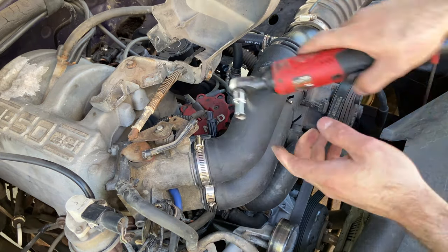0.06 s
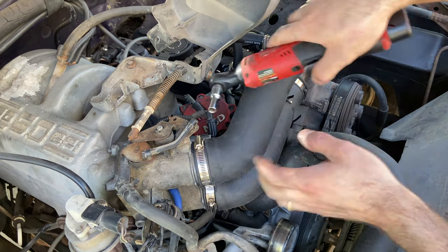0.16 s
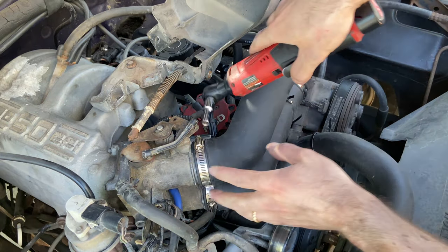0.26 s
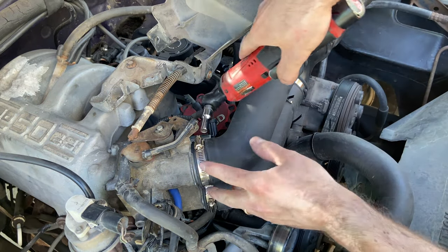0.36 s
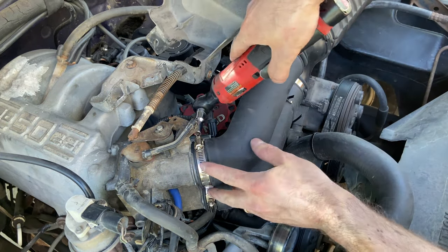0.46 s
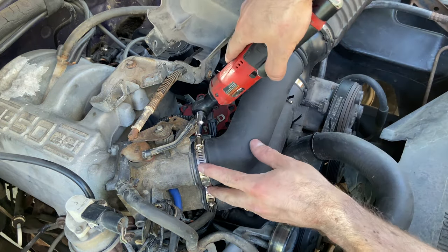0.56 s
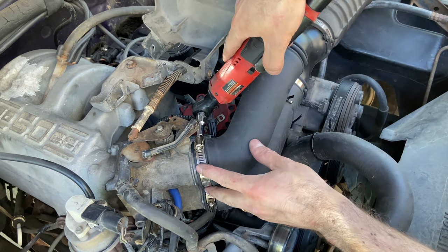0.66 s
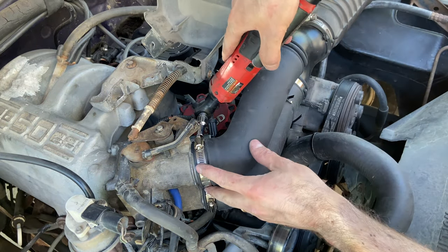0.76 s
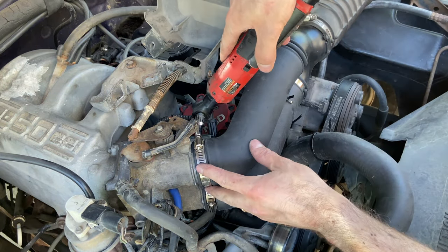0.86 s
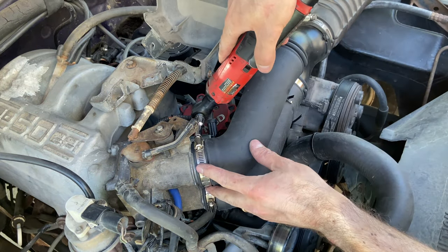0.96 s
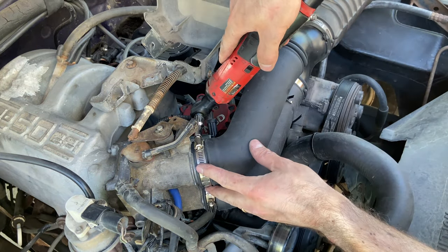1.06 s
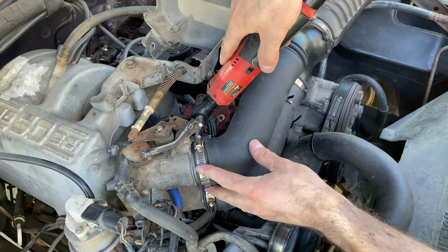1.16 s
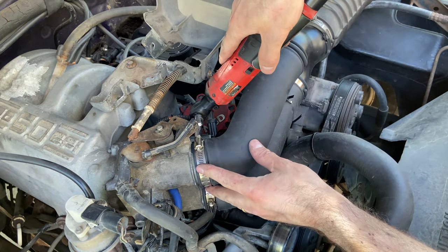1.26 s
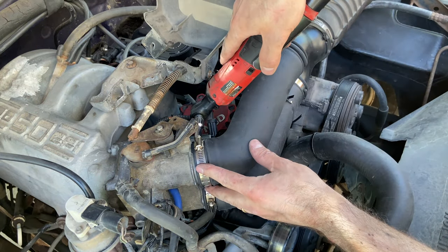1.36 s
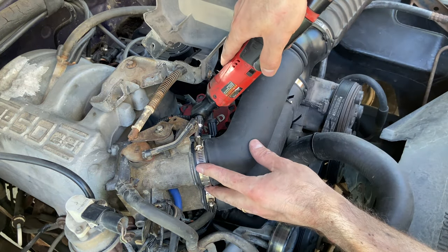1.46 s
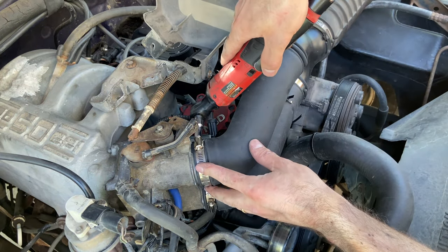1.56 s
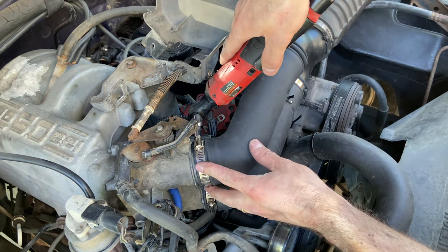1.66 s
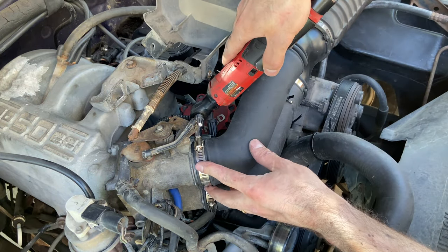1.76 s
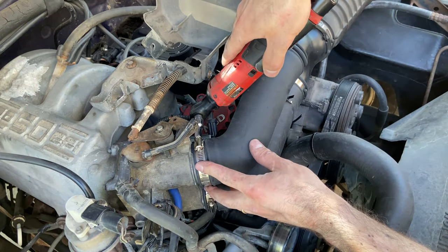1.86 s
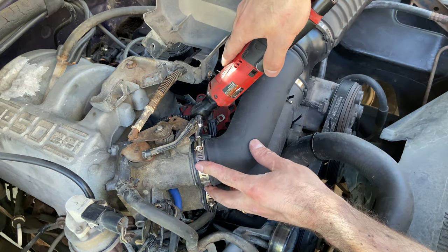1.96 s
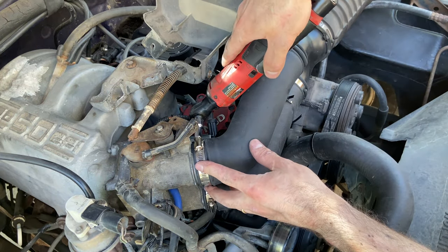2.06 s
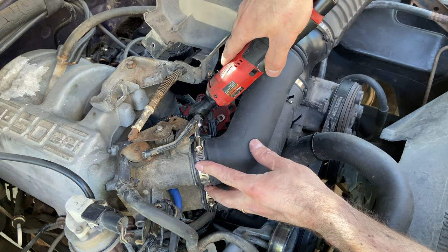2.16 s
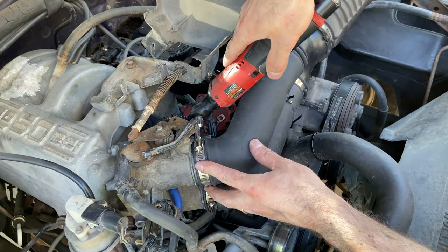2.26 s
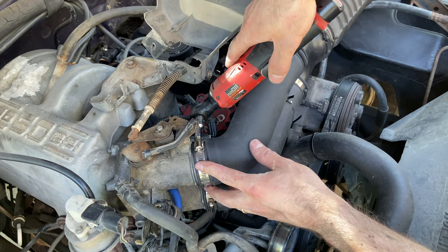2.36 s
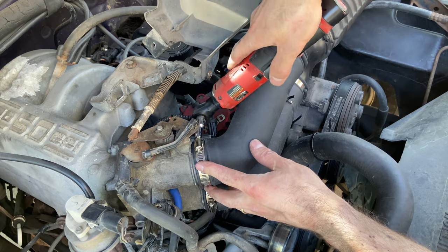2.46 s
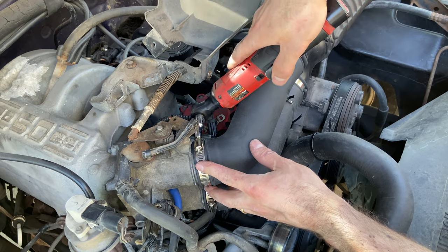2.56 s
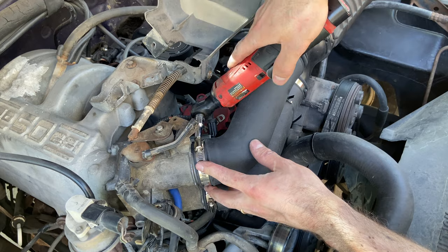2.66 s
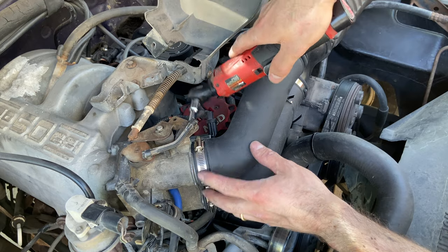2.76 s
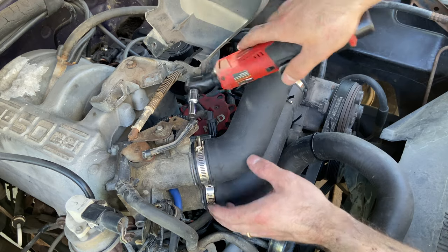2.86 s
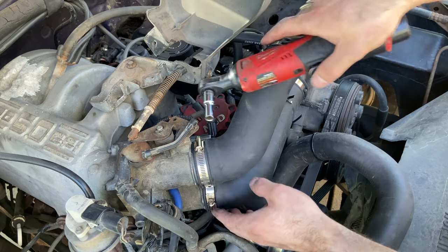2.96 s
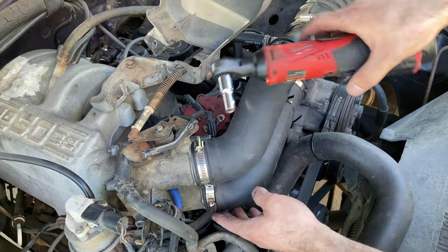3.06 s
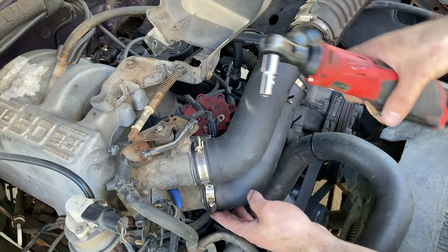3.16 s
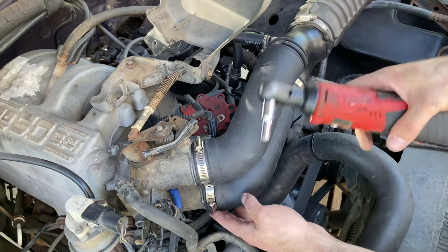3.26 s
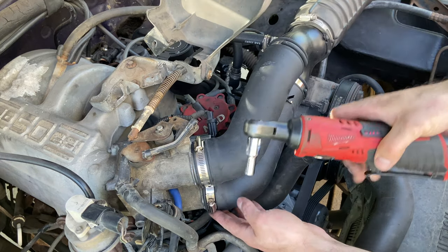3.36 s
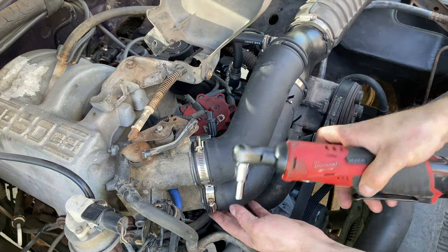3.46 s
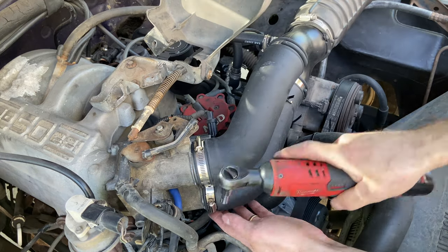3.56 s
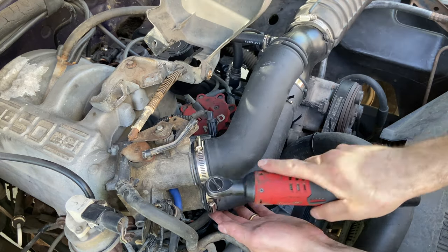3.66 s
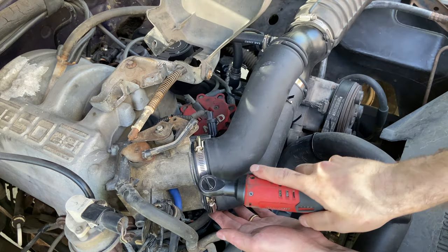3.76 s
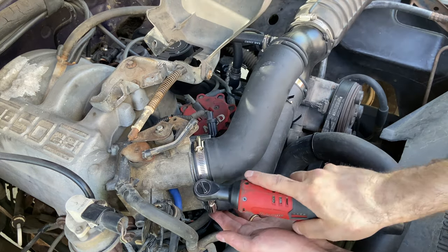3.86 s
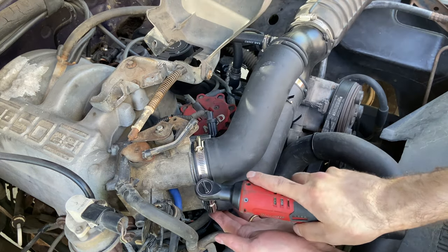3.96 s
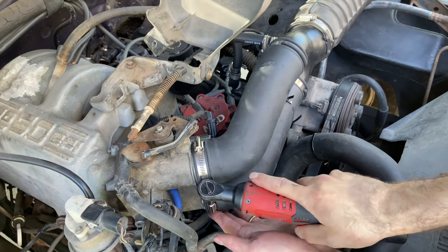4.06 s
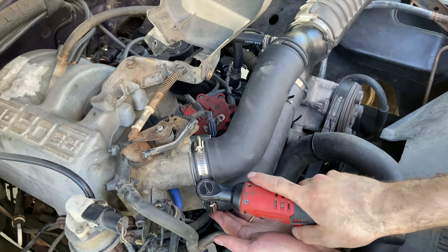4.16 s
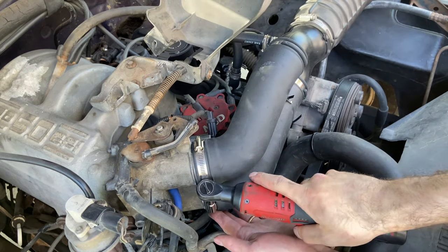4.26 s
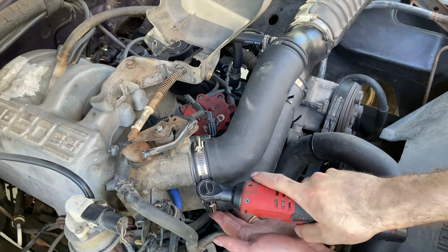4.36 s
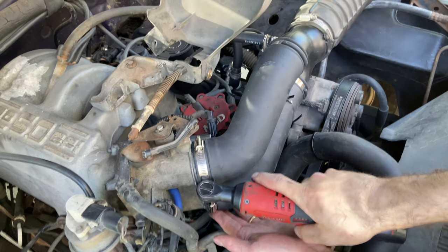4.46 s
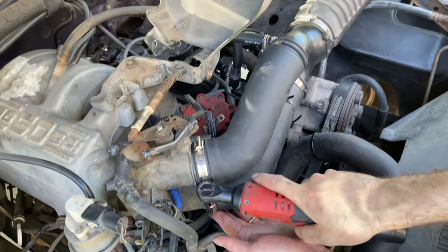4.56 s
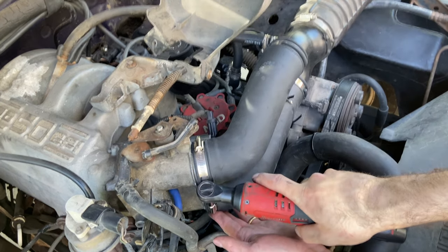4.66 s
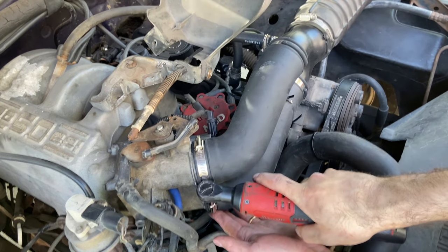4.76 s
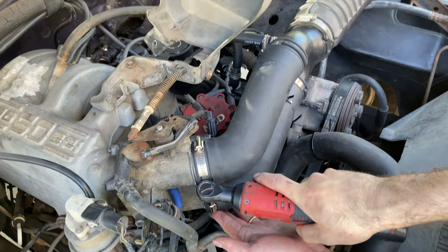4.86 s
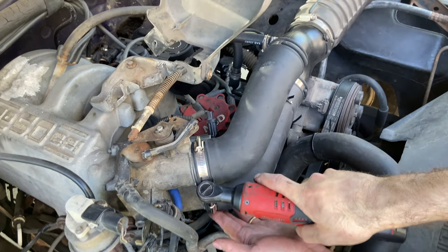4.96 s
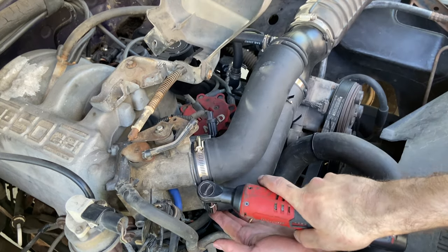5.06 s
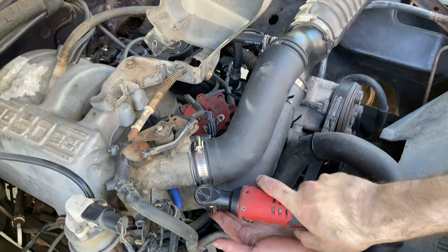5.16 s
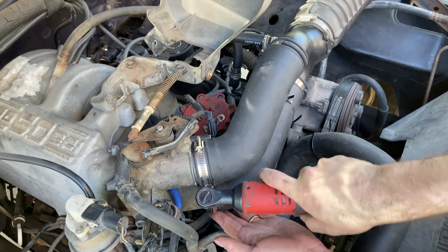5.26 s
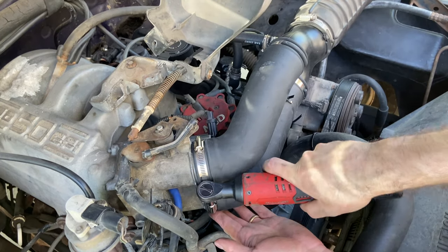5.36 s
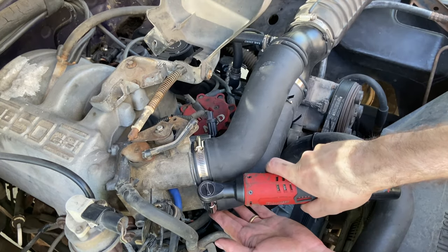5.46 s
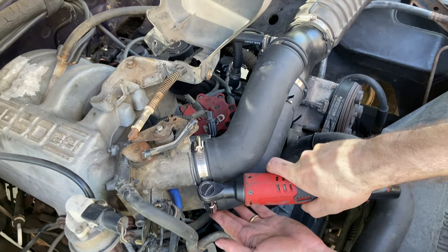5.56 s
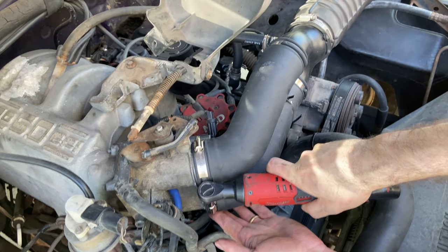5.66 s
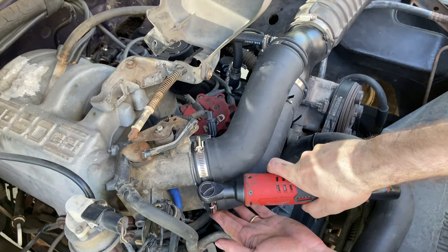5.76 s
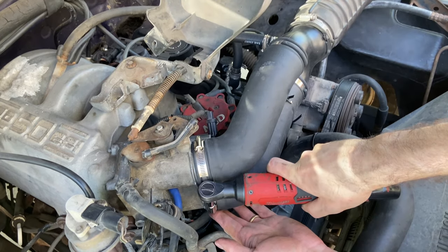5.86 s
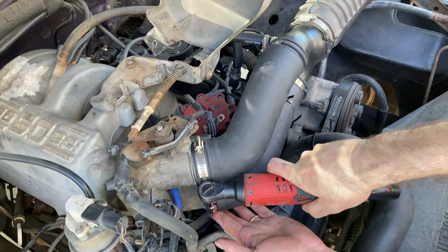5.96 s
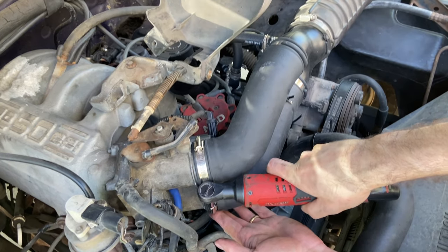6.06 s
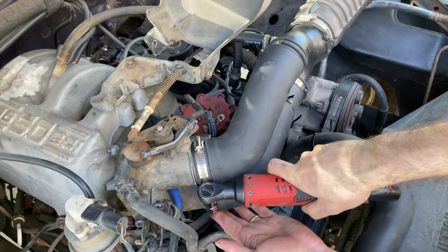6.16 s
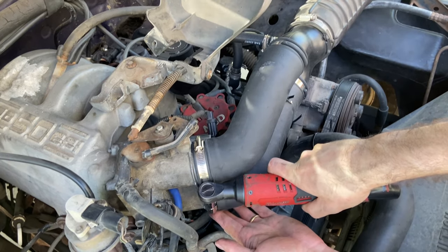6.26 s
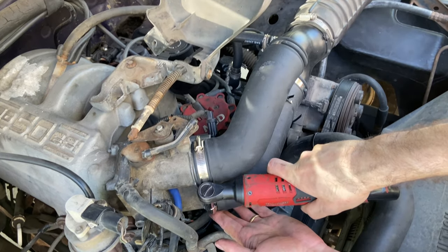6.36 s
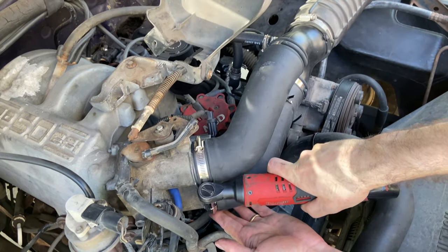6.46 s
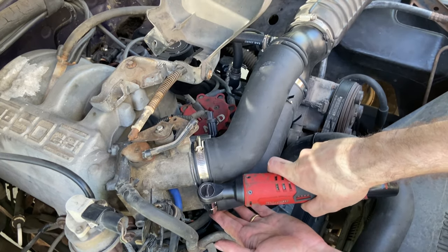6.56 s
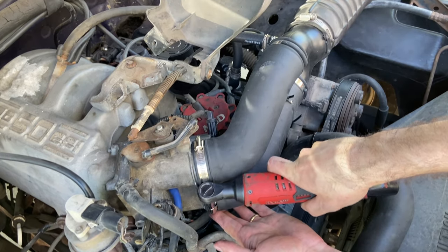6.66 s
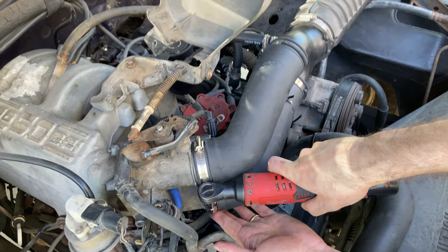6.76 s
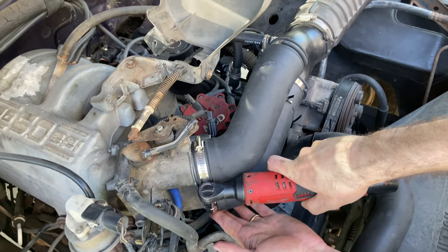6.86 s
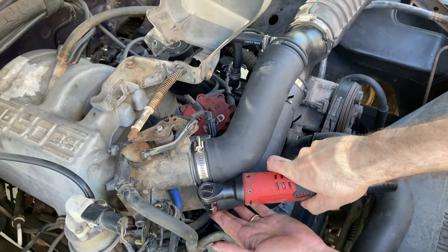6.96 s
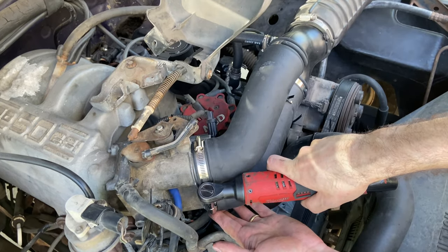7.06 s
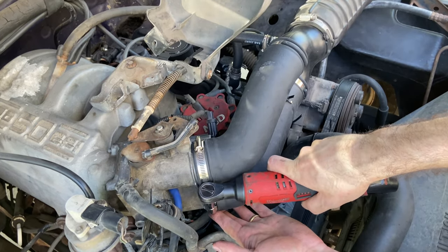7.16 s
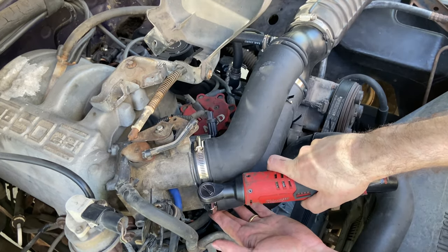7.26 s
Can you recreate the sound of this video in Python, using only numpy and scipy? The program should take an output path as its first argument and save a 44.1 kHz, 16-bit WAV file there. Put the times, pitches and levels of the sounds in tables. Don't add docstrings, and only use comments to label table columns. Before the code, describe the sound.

Outdoors, a close stereo microphone hears light finger and socket taps on hose and metal, then a cordless electric ratchet bursting into a bright, grainy clicking rattle that slows to separate ticks. Dull hose thumps and a metal knock follow as it moves. It then runs twice at length, each winding down, and ends with a feeble short pull. Wind buffets the microphone over faint traffic and leaves.

```python
import sys
import numpy as np
from scipy import signal
from scipy.fft import rfft, irfft, next_fast_len
from scipy.io import wavfile
from scipy.ndimage import uniform_filter1d

SR = 44100
rng = np.random.default_rng(int(sys.argv[2]) if len(sys.argv) > 2 else 0)


def field_ratio(decibels):
    return 10 ** (np.asarray(decibels, dtype=float) / 20)


def unload_audio(sound):
    columns = np.transpose(np.atleast_2d(sound))
    steps = np.round(np.clip(columns, -1, 1) * 32767)
    wavfile.write(sys.argv[1], SR, steps.astype(np.int16))


N = 322275
SPAN = next_fast_len(N)
TIME = np.arange(N) / SR
FREQ = np.maximum(np.fft.rfftfreq(SPAN, 1 / SR), 1)

# [s, s].
BURSTS = [
    (1.072, 2.425),
    (4.37, 5.745),
    (5.785, 6.93),
    (7.0, 7.31),
]
# [s, dB].
GEARS = [
    [(1.072, -42), (1.132, -23.5), (1.344, -25), (1.4, -29), (1.612, -29.5), (1.8, -28), (2.1, -30.5),
     (2.264, -36.5), (2.42, -59.5)],
    [(4.37, -43), (4.418, -24.5), (4.496, -26.5), (4.938, -26), (5.222, -33.5), (5.498, -43.5),
     (5.628, -45.5), (5.74, -79)],
    [(5.8, -51), (5.823, -31.5), (5.901, -27.5), (6.345, -28.5), (6.403, -26), (6.639, -32), (6.816, -49),
     (6.93, -76)],
    [(7.0, -60.5), (7.238, -46), (7.308, -70)],
]
# [s, count].
STROKES = [
    [(1.1372, 0), (1.1883, 4), (1.2851, 12), (1.3588, 18), (1.4226, 23), (1.5281, 31), (1.6908, 43),
     (1.8434, 54), (1.97, 63), (2.0559, 69), (2.1209, 73), (2.1776, 76)],
    [(4.4365, 100), (4.4869, 104), (4.5463, 109), (4.7076, 123), (4.8813, 138), (4.9841, 147),
     (5.0719, 154), (5.1565, 160), (5.2014, 163), (5.2517, 166), (5.2878, 168)],
    [(5.8668, 200), (5.9076, 203), (6.0463, 215), (6.2814, 235), (6.4344, 248), (6.5, 253), (6.544, 256),
     (6.5948, 259), (6.6551, 262), (6.7042, 264)],
]
# [s, dB].
BITE = [
    [(1.13, -16), (1.28, -19), (1.345, -15), (1.361, -7), (1.39, -18), (1.52, -23), (1.665, -22),
     (1.695, -11), (1.74, -17), (1.84, -19), (1.885, -14), (1.94, -23), (2.04, -21), (2.18, -26)],
    [(4.43, -11), (4.5, -11), (4.53, -17), (4.56, -11), (4.59, -18), (4.62, -12), (4.82, -13), (4.92, -17),
     (5.01, -19), (5.036, -12), (5.09, -21), (5.19, -25), (5.29, -28)],
    [(5.86, -18), (5.95, -21), (6.045, -14), (6.13, -19), (6.26, -25), (6.33, -13), (6.38, -20),
     (6.47, -22), (6.6, -25), (6.71, -30)],
]
# [s, dB].
PICK_UP_SNAPS = [(1.0734, -19.5), (1.0812, -22), (1.1039, -7.5), (1.1234, -21), (4.3823, -13),
                 (4.3895, -29.5), (4.407, -9), (4.4225, -14), (5.816, -22), (5.8391, -32), (5.8526, -13),
                 (7.032, -21.5), (7.1043, -25), (7.1657, -23.5), (7.217, -20), (7.2865, -19)]
# [s, dB].
COASTING_SNAPS = [(2.2, -20), (2.224, -19), (2.281, -20), (2.3186, -20), (2.375, -22), (5.3068, -26),
                  (5.3252, -20), (5.347, -20), (5.367, -21), (5.3877, -18), (5.4118, -17.5), (5.436, -19),
                  (5.463, -22), (5.489, -19.5), (5.4964, -26), (5.5218, -21), (5.5274, -23.5),
                  (5.556, -18.5), (5.5965, -21), (5.645, -22), (5.728, -22.5), (6.7352, -24), (6.7693, -22),
                  (6.814, -23), (6.8925, -26)]
# [s, dB, dB].
YOKE_STOPS = [(2.2538, -34, -37), (2.272, -30, -47), (2.293, -37, -49), (2.3355, -33, -48),
              (2.36, -32.5, -50), (2.4068, -33.5, -56), (5.42, -29, -40), (5.446, -35, -39),
              (5.4724, -29.5, -26), (5.5677, -33, -34), (5.6138, -34.5, -34), (5.6679, -33.5, -32),
              (5.6976, -37.5, -40), (5.7868, -33, -37), (5.824, -39, -33), (6.728, -31.5, -38),
              (6.764, -30, -42), (6.806, -34, -42), (6.8366, -40, -55), (6.863, -39, -47),
              (6.871, -36, -51), (6.949, -41, -59), (7.007, -40.5, -55), (7.0586, -36, -52),
              (7.092, -36, -40), (7.126, -36, -36), (7.152, -37, -51), (7.1856, -35.5, -43),
              (7.21, -37, -49), (7.2406, -33, -50), (7.27, -37, -56)]
# [Hz, Hz, dB].
PAWL_MODES = [(12450, 450, -2), (12850, 450, 0), (13250, 350, -3), (15200, 900, -11)]
# [Hz, Hz, dB].
YOKE_MODES = [(10640, 700, 5), (12200, 1200, -6), (14300, 550, -5)]
# [Hz, dB per Hz].
RATTLE_COLOUR = [(700, -47), (1500, -12.5), (3000, -1), (6000, 0.5), (9000, -0.5), (11500, -1.5),
                 (13000, -36), (14300, 1), (15300, 4), (17000, -41)]
# [Hz, dB per Hz].
BOOM_COLOUR = [(110, -42), (180, -5), (215, -10), (304, -3.5), (387, -44), (448, 2.5), (613, -8),
               (848, -0.5), (1110, 0), (1420, -5.5), (2200, -11.5), (2860, -10), (4840, -120)]
# [Hz, Hz, dB, dB, dB].
HOUSING_MODES = [(356, 96, -1.5, 1.5, 6.5), (501, 13, 0.5, -10, -0.5), (620, 21.4, -31, 0.5, 7.5),
                 (790, 295, 0, -22, -19), (1078, 105, 0, -8, -11), (1580, 156, 0.5, -11, -27),
                 (2102, 113, -8.5, -7, -0.5), (2345, 260, -1, -29, -19), (2954, 66, -15.5, -2.5, -4),
                 (3256, 110, -3.5, -30, -14), (3595, 127, -12, -8, -13), (5000, 600, -4.5, -9.5, -9.5),
                 (8160, 1200, -20, -31, -46), (9950, 1660, -4.5, -3, -2.5)]
MOVES_S = 3.5, 5.78

# [s, dB, Hz, s].
ON_METAL = [(0.392, -51, 2210, .03), (0.45, -36.5, 2400, 0.031), (0.456, -44, 1010, .04),
            (0.5839, -33.5, 6960, 0.03), (0.6205, -46, 7230, .035), (0.6644, -50, 3210, .026),
            (0.8535, -32.5, 3100, 0.035), (0.9175, -52, 4480, .03), (2.805, -25.5, 2000, 0.027),
            (2.808, -33, 900, 0.044), (2.815, -28, 2240, 0.11), (2.821, -39, 2750, 0.044),
            (3.009, -49, 2840, 0.034), (3.0995, -48, 5600, .03), (3.195, -46, 7200, .02),
            (3.759, -40, 3700, 0.025), (3.761, -48, 4480, 0.02), (3.936, -52, 9000, .02),
            (3.8786, -35, 7400, 0.04), (4.0057, -42, 2000, 0.018), (4.014, -42.5, 2030, 0.089)]
# [s, dB, Hz, s].
ON_RUBBER = [(0.0044, -42.5, 2360, 0.06), (0.0332, -43, 2430, .026), (0.17, -40, 2180, 0.043),
             (0.1929, -32, 2400, 0.021), (0.191, -43, 1100, 0.029), (0.5328, -42, 3180, .024),
             (0.7746, -45, 1210, .05), (0.787, -46, 900, .05), (0.978, -39, 1910, .02),
             (0.996, -37, 3870, 0.014), (2.7153, -35.5, 2880, 0.042), (2.728, -41, 4080, 0.03),
             (3.1, -46, 2730, 0.22), (3.1694, -43, 2070, 0.052), (3.185, -42.5, 2300, 0.1),
             (3.2863, -34, 2230, 0.076), (3.3203, -43, 2040, .03), (3.4372, -31, 2200, 0.029),
             (3.438, -37.5, 1450, .04), (3.4436, -34, 3700, 0.017)]
METAL_BALANCE_DB = -4, 0
RUBBER_BALANCE_DB = -18, 0
# [s, dB, Hz, s].
THUMPS = [(0.775, -39.5, 129, 0.08), (1.067, -49, 86.1, 0.064), (2.155, -37, 61.9, 0.071),
          (2.438, -24.5, 71, 0.14), (2.607, -24.5, 122, 0.05), (3.943, -36, 330, 0.082),
          (4.304, -34.5, 433, 0.067), (2.814, -18, 175, 0.083), (3.256, -26, 75.4, 0.073),
          (3.339, -27.5, 61.9, 0.088), (3.681, -25, 98, 0.16), (3.748, -22, 78.1, 0.069),
          (3.801, -30.5, 91, 0.13), (3.946, -47, 105, 0.08), (4.318, -32, 98.5, 0.071)]
# [s, s, dB, dB].
WHINES = [
    (1.048, 1.088, -38, -53),
    (4.338, 4.372, -54, -64),
    (5.767, 5.8, -70, -68),
    (6.925, 7.02, -68, -66),
]
# [s, s, Hz, dB].
CHIRP = (.395, .47, 6280, -68)

# [s, dB].
WIND = [(0, -80), (.4, -76), (.73, -47), (1.0, -52), (1.14, -76), (1.57, -60), (1.85, -53), (2.1, -44),
        (2.7, -46), (3.55, -46.5), (4.1, -45), (4.3, -50), (5.05, -49.5), (5.2, -57), (6.6, -50),
        (6.9, -56.5), (7.31, -54.5)]
# [s, dB].
BUFFETS = [(.79, -39), (.89, -39.5), (1.08, -41.5), (1.63, -49), (2.16, -35.5), (2.44, -63), (2.61, -37.5),
           (2.81, -37), (2.88, -34.5), (2.96, -39.5), (3.1, -39), (3.17, -36), (3.26, -36.5), (3.35, -38.5),
           (3.42, -40), (3.68, -53), (3.75, -42), (3.81, -37), (3.95, -38), (4.34, -36), (4.44, -38.5),
           (4.72, -43)]
# [Hz, dB per Hz].
GUST_COLOUR = [(12, -57), (20, -58), (54, -1), (80, -1), (113, -0.5), (166, -13.5), (201, -11), (261, -16),
               (400, -28), (520, -22.5), (880, -120)]
# [Hz, dB per Hz].
STREET_COLOUR = [(59, -39.5), (100, -8), (367, -13), (645, -10), (824, -14.5), (1010, -12), (1850, -23.5),
                 (2110, -25.5), (5410, -38.5), (9000, -76), (11700, -83), (19800, -120)]
# [s, dB, dB].
TRAFFIC = [(0, -50, -72), (.2, -46.5, -57), (.4, -48, -70), (1, -47.5, -70.5), (2.5, -53.5, -73),
           (3.2, -51, -67.5), (4.3, -50, -70.5), (7.31, -56.5, -60.5)]
# [Hz, dB].
PORT_TILT = [(100, 1), (380, 5), (700, 4), (1300, 1.5), (4400, 1.8), (15000, 0)]
# [Hz, dB].
BAY_SCATTER = [(200, -2), (1000, -2), (4000, 1), (7500, -1), (9000, -11), (12000, -22), (16000, -24)]

CLICK_T60_S, BAY_T60_S, BAY_TAIL_DB = 0.0074, 0.066, -15.5


def ratchet():
    gear_db, = columns(GEARS)
    turns, = columns(STROKES)
    running = gate([(run[0][0] - .003, run[-1][0] + .003) for run in STROKES], size=60)
    high, body, low = fast_clicks(turns, running) + yoke_swings(turns, running, gear_db) + slow_clicks()
    steel = modes(PAWL_MODES) * modes([(13800, 2360, 0.016)])
    clicks = struck(steel, high, body, field_ratio(-6.0) * low)
    back, _, ring_db = np.transpose(YOKE_STOPS)
    clicks = clicks + ring(decays(back, ring_db, 1.6 * CLICK_T60_S), modes(YOKE_MODES))
    return shell(clicks + gear_rattle(gear_db, turns, running))


def fast_clicks(turns, running):
    pawl_db, = columns(BITE)
    hit = crossings(turns, running)
    chance = rng.standard_normal((6, len(hit)))
    first = hit / SR + 0.0005 * chance[0]
    size_db = pawl_db[hit] - 3.5
    fast = decays(first, size_db + 2.2 * chance[1], CLICK_T60_S)
    fast += decays(first + 0.0021 + 0.000084 * chance[2], size_db - 8.5 + 1.4 * chance[3], CLICK_T60_S)
    fast += decays(first + .0045 + .0012 * chance[4], size_db - 6 + 3.0 * chance[5], CLICK_T60_S)
    return np.array([fast, field_ratio(-14.5) * fast, 0 * fast])


def yoke_swings(turns, running, gear_db):
    half = crossings(turns + .5, running)
    swing_db = gear_db[half] - 15 + 2.5 * rng.standard_normal((2, len(half)))
    body = decays(half / SR, swing_db[0] + 12.5, 1.54 * CLICK_T60_S)
    low = decays(half / SR, swing_db[1] + 13.5, 2.25 * CLICK_T60_S)
    return np.array([0 * body, body, low])


def slow_clicks():
    s, db = np.transpose(PICK_UP_SNAPS + COASTING_SNAPS)
    back, knock_db, _ = np.transpose(YOKE_STOPS)
    bounce = rng.standard_normal((4, len(s)))
    high = decays(s, db - 1.5, 1.15 * CLICK_T60_S)
    high += decays(s + .0025 + .0006 * bounce[0], db - 8 + 2.5 * bounce[1], 1.2 * CLICK_T60_S)
    times = np.concatenate([s, back])
    body_db = np.concatenate([db - 15.5 + 2 * bounce[2], knock_db])
    low_db = np.concatenate([db - 22 + 2 * bounce[3], knock_db - 7.5])
    body = decays(times, body_db, 2.0 * CLICK_T60_S)
    low = decays(times, low_db, 2.8 * CLICK_T60_S)
    return np.array([high, body, low])


def gear_rattle(gear_db, turns, running):
    beat = 1 + running * (0.24 * np.cos(2 * np.pi * turns - 1.1) + 0.16 * np.cos(6 * np.pi * turns))
    grain = field_ratio(2.5 * walk(600) + 1.6 * walk(40))
    teeth = rng.standard_normal((3, N)) * beat * grain
    rattle = unit(through(teeth, shape(RATTLE_COLOUR)))
    boom = unit(through(teeth, shape(BOOM_COLOUR)))
    effort_db = gear_db + 26
    boom_gain = field_ratio(-14.5 - 0.57 * effort_db)
    return gate(BURSTS, size=100) * field_ratio(gear_db - 0.46) * (rattle + boom_gain * boom)


def shell(x):
    place = np.searchsorted(MOVES_S, TIME)
    out = x
    for hz, width, *dbs in HOUSING_MODES:
        level_db = np.array(dbs)[place] + 3.5 + 3.8 * walk(12)
        out = out + field_ratio(level_db) * through(x, modes([(hz, width, 0)]))
    return out


def handling():
    s, db, body_hz, t60 = np.transpose(ON_METAL + ON_RUBBER)
    balance = [METAL_BALANCE_DB] * len(ON_METAL) + [RUBBER_BALANCE_DB] * len(ON_RUBBER)
    ring_db, low_db = np.transpose(balance)
    high = decays(s, db + ring_db - 6.0, 0.79 * t60)
    body = decays(s, db - 15.5, t60)
    low = decays(s, db + low_db - 9.5, 2.0 * t60)
    out = struck(modes([(9900, 9600, 0)]) ** 2, high, body, low)
    for at, peak_db, hz, fall in zip(s, db, body_hz, t60):
        i = int(at * SR)
        burst = rng.standard_normal((3, 3000)) * field_ratio(peak_db + 4.0 - 60 * TIME[:3000] / (1.4 * fall))
        out[:, i:i + 3000] += signal.lfilter(*signal.iirpeak(hz, 6.0, fs=SR), burst)
    for at, peak_db, hz, fall in THUMPS:
        out[0] += decays([at], peak_db - 0.5, fall) * np.sin(2 * np.pi * hz * (TIME - at))
    return out


def coil_whine():
    switch_hz, even_db = 1876, -8
    out = 0
    for start, end, first_db, third_db in WHINES:
        dbs = first_db, third_db + even_db, third_db, third_db + even_db
        coils = sum(field_ratio(db) * np.sin(2 * np.pi * k * switch_hz * TIME) for k, db in enumerate(dbs, 1))
        out = out + gate([(start, end)], size=300) * coils
    return out


def bird():
    start, end, hz, db = CHIRP
    return gate([(start, end)], size=900) * field_ratio(db + 3 * walk(30)) * np.sin(2 * np.pi * hz * TIME)


def wind():
    rise_db_per_s, fall_db_per_s = 204, 192.5
    wind_db, = columns([WIND])
    for s, db in BUFFETS:
        away = np.maximum(rise_db_per_s * (s - TIME), fall_db_per_s * (TIME - s))
        wind_db = np.maximum(wind_db, db - away)
    return field_ratio(wind_db + 1.5 * walk(14)) * wide_noise(shape(GUST_COLOUR))


def traffic_and_leaves():
    street_db, rustle_db = columns([TRAFFIC])
    street = field_ratio(street_db + 1.3 * walk(5)) * wide_noise(shape(STREET_COLOUR))
    hiss = modes([(5000, 15000, 0)]) ** 2
    leaves = noise(hiss)[0]
    shared = np.array([through(leaves, late(sign)) for sign in (1, -1)])
    scattered = noise(hiss * (shape(BAY_SCATTER) + .35), count=2) * .75
    return street + field_ratio(rustle_db) * (shared + scattered)


def struck(steel, high, body, low):
    crack = ring(body, modes([(4560, 5800, 0)]) ** 2)
    knock = ring(low, modes([(1100, 1950, 0)]) ** 2)
    return ring(high, steel) + crack + knock


def ring(env, response):
    level = np.sqrt(np.mean(abs(response) ** 2))
    return through(env * rng.standard_normal((3, N)), response / level)


def decays(times, dbs, t60s):
    env, tail = np.zeros(N + 5000), np.arange(5000) / SR
    for s, db, t60 in np.broadcast(times, dbs, t60s):
        i = int(s * SR)
        env[i:i + len(tail)] += field_ratio(db - 60 * tail / max(t60, .002))
        env[i:i + len(tail)] += field_ratio(db + BAY_TAIL_DB - 60 * tail / BAY_T60_S)
    return env[:N]


def crossings(turns, running):
    return np.flatnonzero(np.diff(np.floor(turns)) * (running[1:] > .99))


def gate(spans, size):
    return uniform_filter1d(1. * sum((TIME >= a) & (TIME <= b) for a, b in spans), size=size)


def columns(tables):
    s, *cols = np.transpose(np.vstack(tables))
    return [np.interp(TIME, np.maximum.accumulate(s), c) for c in cols]


def walk(rate):
    k = int(SR / rate)
    steps = np.repeat(rng.standard_normal(N // k + 1), k)
    return 0.8 * uniform_filter1d(uniform_filter1d(steps, k), k)[:N]


def unit(x):
    return x / np.sqrt(np.mean(x ** 2, axis=-1, keepdims=True))


def shape(points):
    hz, db = np.transpose(points)
    return field_ratio(np.interp(np.log(FREQ), np.log(hz), db))


def modes(table):
    return sum(field_ratio(db) / (1 + 1j * (FREQ - hz ** 2 / FREQ) / width) for hz, width, db in table)


def through(x, response):
    return irfft(rfft(x, SPAN) * response, SPAN)[..., :N]


def noise(response, count=1):
    return unit(through(rng.standard_normal((count, N)), response))


def wide_noise(response):
    return noise(response) + .8 * np.array([[1], [-1]]) * noise(response)


def late(sign):
    lag_s, lag_turns = .000241, .73
    return np.exp(-1j * np.pi * sign * np.maximum(FREQ * lag_s - lag_turns, .2))


def scene():
    direct, *scattered = ratchet() + handling()
    share, tail = shape(BAY_SCATTER), TIME[:3000]
    facets_db, facets_t60_s = -6, .05
    ports = []
    for sign, echo in zip((1, -1), scattered):
        facets = unit(rng.standard_normal(len(tail)) * field_ratio(-60 * tail / facets_t60_s)) / np.sqrt(len(tail))
        path = late(sign) + field_ratio(facets_db) * share * rfft(facets, SPAN)
        colour = shape(PORT_TILT) ** (sign / 2) / np.sqrt(1 + share ** 2)
        ports.append(field_ratio(0.5) * (through(direct, colour * path) + through(echo, colour * share)))
    return np.array(ports) + coil_whine() + bird() + wind() + traffic_and_leaves()


def band_limit(x):
    return signal.sosfilt(signal.butter(12, 16820, fs=SR, output="sos"), x)


def record(dry):
    bass = np.minimum(FREQ / 40, 1)
    top = field_ratio(-45) + 1 / np.sqrt(1 + np.minimum(FREQ / 15800, 1.2) ** 300)
    mix = through(np.tanh(dry), bass * top)
    return band_limit(mix)


dry = scene()
out = record(dry)
unload_audio(out)
```